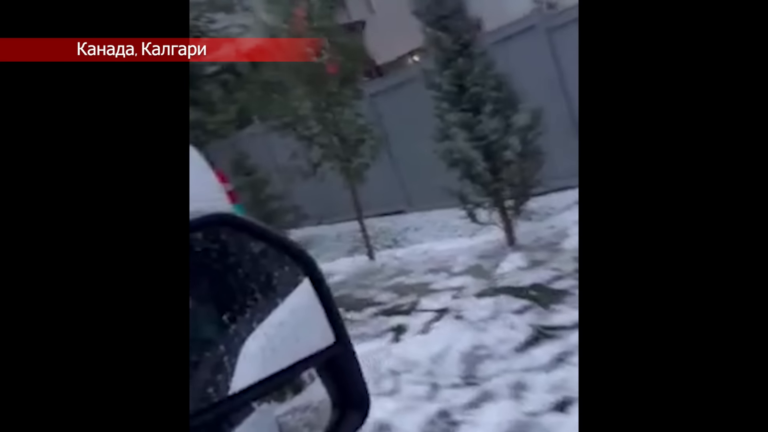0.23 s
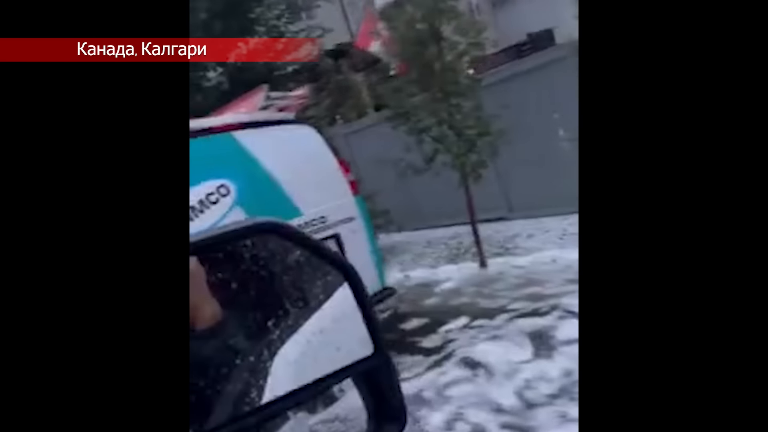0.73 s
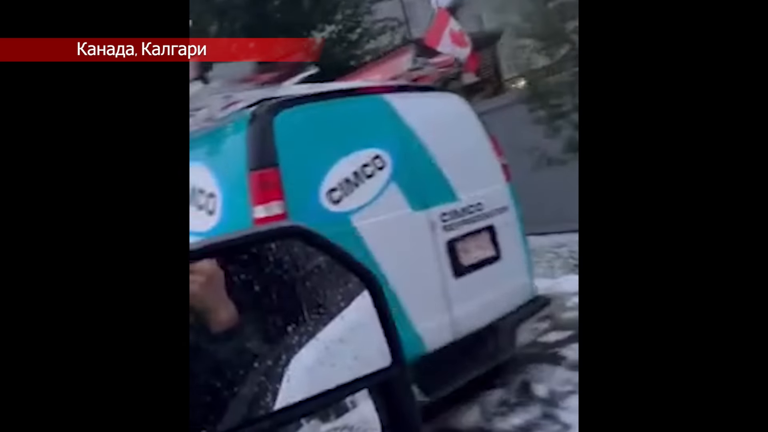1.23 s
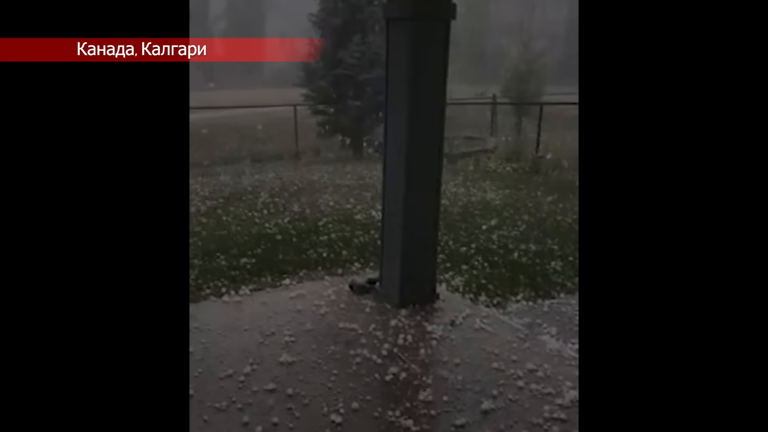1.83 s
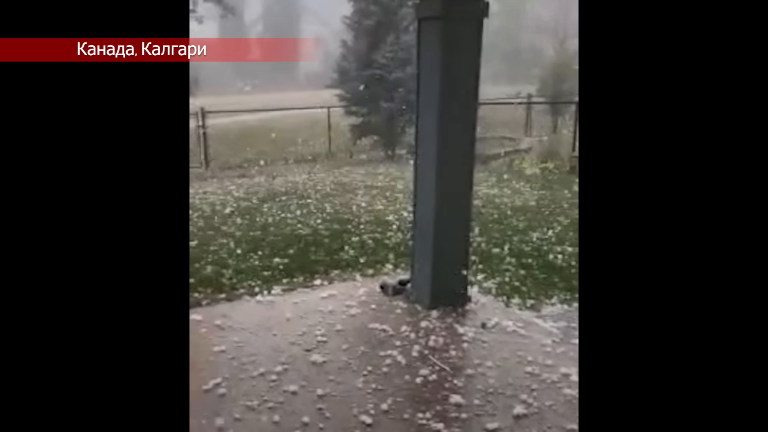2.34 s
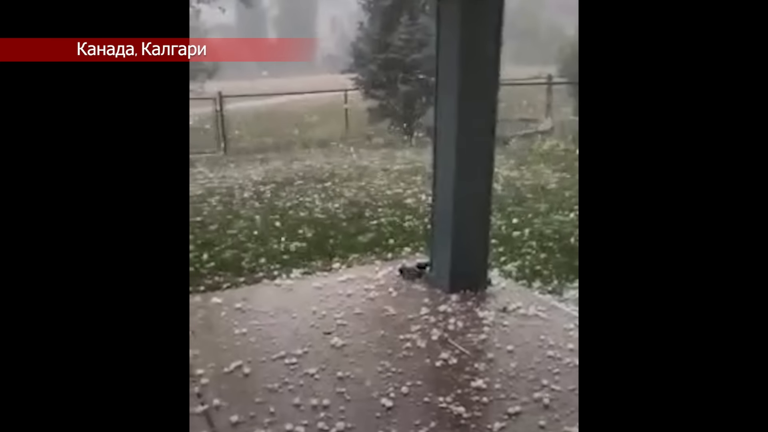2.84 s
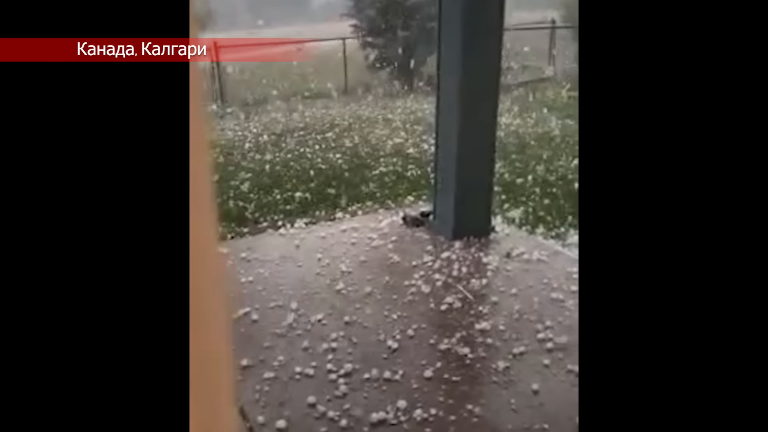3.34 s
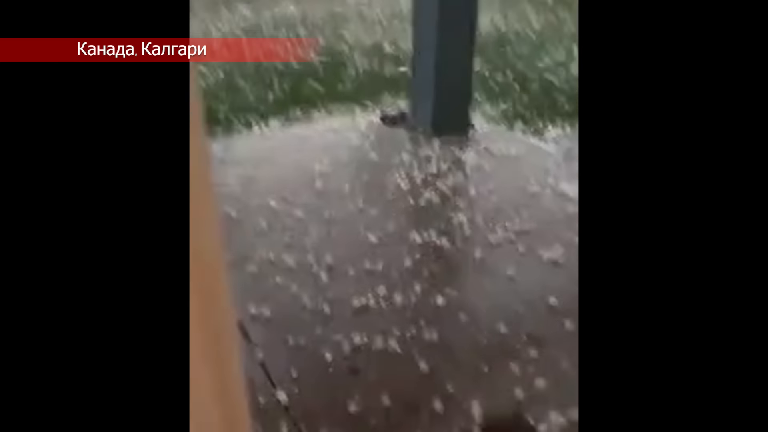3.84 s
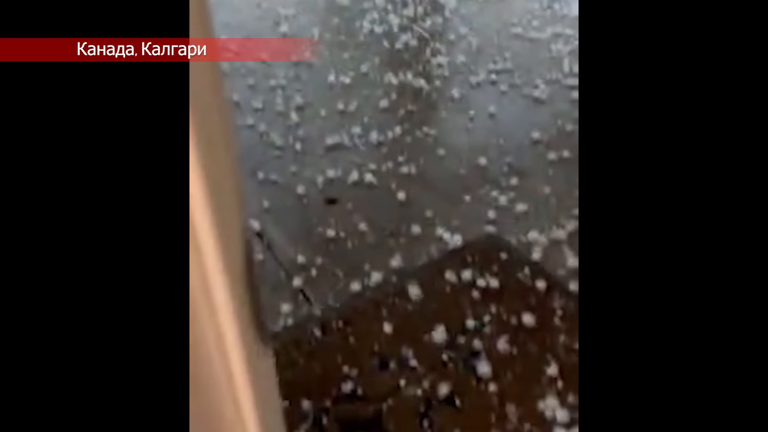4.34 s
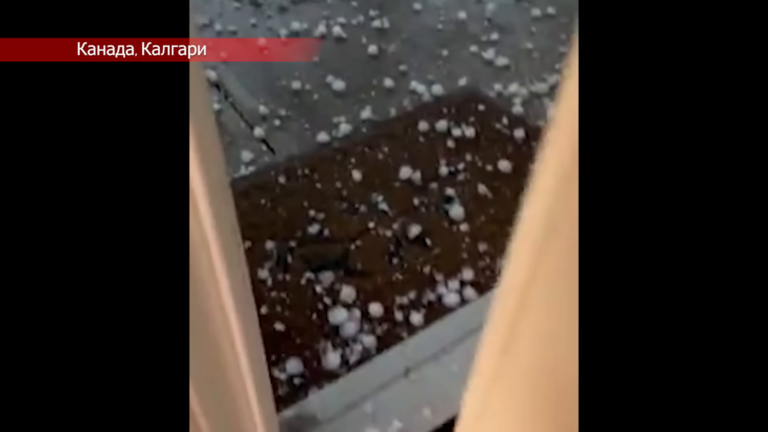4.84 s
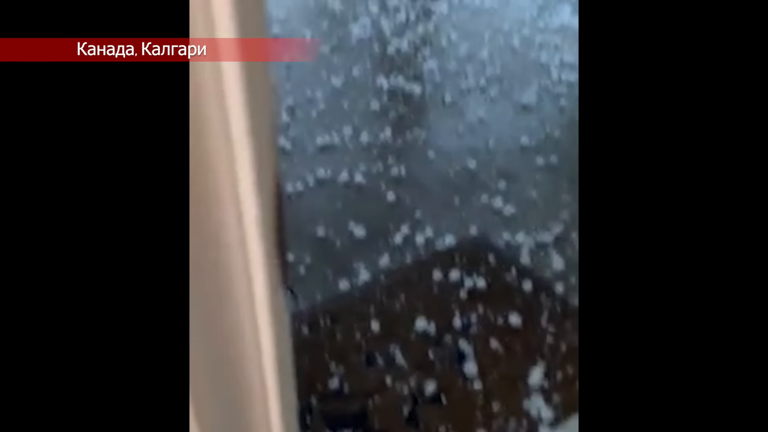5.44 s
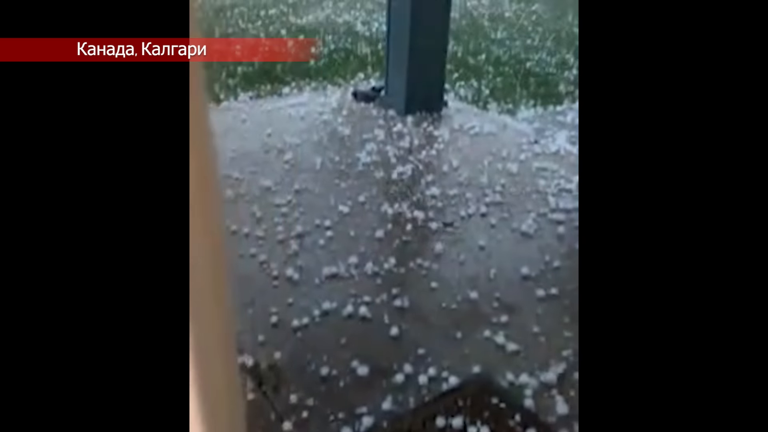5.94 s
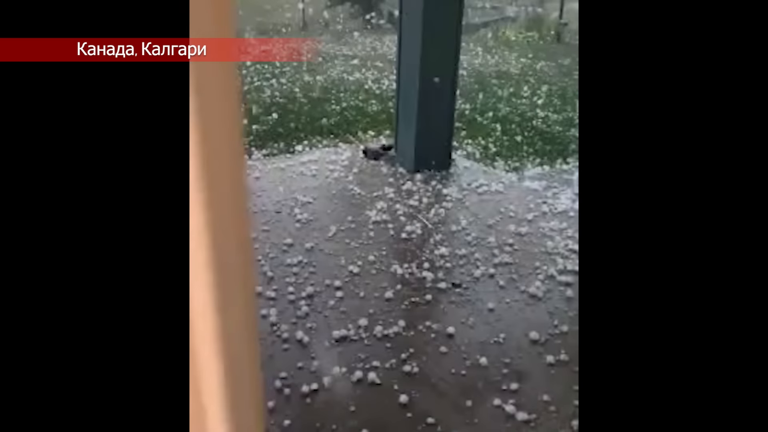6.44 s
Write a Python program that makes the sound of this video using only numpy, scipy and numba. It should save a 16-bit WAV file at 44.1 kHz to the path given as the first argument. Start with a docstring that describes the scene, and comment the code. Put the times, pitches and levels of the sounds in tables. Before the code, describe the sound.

From 0 to 1.65 seconds, a phone at the open window of a slow car hears soft, steady tyre hiss on slush. Low wind buffets thump and flutter against the microphone, thickly clustered until about 0.4, then sparser, with a strong boom near 1.35 and another near 1.56. At 1.65 a hard cut opens onto a hailstorm heard from a doorway. Distant stones make a broad rough roar over faint low rumble; nearer ones patter densely in flurries. Large stones thud dully on roof and lawn and crack sharply on the patio slab, shedding bright splinters with a short porch reflection. It is fullest and widest from 2.7 to 3.8. From about 4.2 the roar drops and heavy hits weaken, quietest near 5.0. It then recovers unevenly, with clear knocks and thuds continuing until the end at about 6.7.

```python
"""Tyres hiss on slush and air buffets thump on the microphone: a phone at the open window of a slow car.
After a hard cut it looks out of a door at a hailstorm: far stones roar, nearer ones patter, and big ones
thud on roof and lawn or crack on the patio slab. The storm dips as the phone turns into the doorway.
Shaped noise makes the hiss, rumble and roar; fading rings make the buffets, patter and single stones.
"""
import sys
import numpy as np
from scipy import signal
from scipy.fft import rfft, irfft
from scipy.io import wavfile
from scipy.ndimage import uniform_filter1d
from numba import njit

SR = 44100
rng = np.random.default_rng(int(sys.argv[2]) if len(sys.argv) > 2 else 0)


def wrap_up_sound(samples):
    """Save the sound to the file named by the first command line argument, as 16-bit audio."""
    columns = np.atleast_2d(samples).T
    # keep every value between -1 and 1, then stretch to whole-number steps
    tamed = np.clip(columns, -1, 1)
    steps = np.round(tamed * 32767).astype(np.int16)
    wavfile.write(sys.argv[1], SR, steps)


N = 294852
CUT_S = 1.655  # the car ends and the hailstorm begins
TIME = np.arange(N) / SR
FREQ = np.maximum(np.arange(N // 2 + 1) * SR / N, 1)


def undb(db):
    """Turn decibels into a gain."""
    return 10 ** (np.asarray(db) / 20)


def over_hz(table, column=1):
    """Join the points of a table column along a log-frequency axis."""
    table = np.array(table)
    return np.interp(np.log(FREQ), np.log(table[:, 0]), table[:, column])


def colour(x, gain):
    """Make each frequency stronger or weaker."""
    return irfft(rfft(x) * gain, N)


def unit(x):
    """Scale to an average (rms) strength of 1."""
    return x / np.sqrt(np.mean(x ** 2))


def walk(rate):
    """Wander smoothly: random levels held for 1 / rate seconds, then averaged twice; spread near 1."""
    hold = int(SR / rate)
    steps = np.repeat(rng.standard_normal(N // hold + 1), hold)
    smooth = uniform_filter1d(uniform_filter1d(steps, hold), hold)
    return np.sqrt(2) * smooth[:N]


@njit
def ring(out, s, hz, size, t60, rise_s, phase):
    """Add damped sine rings, each with its own starting phase in either channel."""
    for k in range(len(s)):
        start = max(int(s[k] * SR), 0)
        # one sample's turn and decay; t60 is the time to fade by 60 dB
        turn = np.exp(2j * np.pi * hz[k] / SR - np.log(1000) / (t60[k] * SR))
        za, zb = size[k] * np.exp(1j * phase[k, 0]), size[k] * np.exp(1j * phase[k, 1])
        lack, fill = 1., np.exp(-1 / (rise_s * SR))
        for i in range(start, min(start + int(t60[k] * SR), out.shape[1])):
            lack *= fill
            za, zb = za * turn, zb * turn
            out[0, i] += (1 - lack) * za.imag
            out[1, i] += (1 - lack) * zb.imag
    return out


def blows(s, hz, db, t60, octaves, rise_s, late, scatter_s, count, loose=1):
    """Each blow rings modes scattered around its pitch; low ones start later, high ones die sooner."""
    s, hz, db, t60 = (np.reshape(v + 0. * s, (-1, 1)) for v in (s, hz, db, t60))
    share = (np.arange(count) + rng.random((len(s), count))) / count
    share = np.clip(share, .01, .99)
    step = 2 ** (octaves * np.log(share / (1 - share)) / 2)  # dense at the pitch, sparse far from it
    mode_hz = np.minimum(hz * step, .4 * SR)
    start = s + late / mode_hz + scatter_s * rng.random(step.shape) ** 2  # late is in cycles
    size = undb(db) / np.sqrt(count) + 0 * step
    fade_s = np.clip(t60 / np.sqrt(step), .002, .6)
    # the less loose the phases, the more the modes start together as a tick
    phase = 2 * np.pi * np.clip(loose, 0, 1) * rng.random((step.size, 2))
    return ring(np.zeros((2, N)), start.ravel(), mode_hz.ravel(), size.ravel(),
                fade_s.ravel(), max(rise_s, 1e-5), phase)


# Colour of tyres on slush, per channel before the ports: f/Hz, level/dB (per Hz)
TYRE_HISS = [(60, -68), (200, -70.5), (500, -71.5), (900, -72.5), (2300, -73.5), (3300, -77.5), (5000, -82),
             (6200, -80), (8500, -80), (10000, -83.5), (11300, -86), (13000, -101), (15600, -87)]


def tyres():
    """Smooth wet hiss: noise weighted by frequency, with a barely flickering level."""
    hiss = colour(rng.standard_normal((2, N)), undb(over_hz(TYRE_HISS)) * np.sqrt(SR / 2))
    return hiss * undb(.4 * walk(14))


# Draught on the microphone: t/s, level/dB (rumble)
DRAUGHT_RUMBLE = [(0, -22), (.15, -35), (.3, -28), (.44, -40), (.6, -47), (1.0, -49), (1.3, -43),
                  (1.45, -43), (1.65, -46)]
# Single puffs of air: t/s, level/dB (boom), f/Hz (centre of boom), level/dB (flutter),
# f/Hz (centre of flutter), nominal boom cycles to fade by 60 dB (the fade time is kept within limits)
AIR_BUFFETS = [(0.0, -36, 87, -9.5, 341, 11), (0.028, -13, 54, -12.5, 325, 18),
               (0.054, -22, 59.4, -16, 344, 12), (0.106, -6.5, 116, -17, 200, 8),
               (0.166, -17, 69, -16, 201, 14), (0.231, -11, 89, -17.5, 326, 9.5),
               (0.254, -8.5, 70.6, -36, 150, 6.5), (0.293, -8, 74, -9, 199, 12.5),
               (0.309, -20, 112, -11, 384, -1), (0.338, -12, 48.4, -12, 257, 9.5),
               (0.401, -27, 70, -29, 198, 5), (0.519, -26.5, 62, -18.5, 336, 17),
               (0.595, -25, 55, -29, 200, 5), (0.852, -22, 68.6, -13, 198, 9.5),
               (1.028, -24.5, 58, -37.5, 150, 9), (1.149, -20, 75, -21.5, 290, 6),
               (1.222, -27, 65, -36, 150, 6), (1.32, -22, 57, -22, 200, 8),
               (1.355, -4.5, 88, -16, 400, 6.5), (1.558, -15.5, 70.4, -17.5, 200, 9),
               (1.594, -28, 60.3, -18.5, 260, 6)]


def air():
    """Low noise rumbles with the draught; each buffet is a short boom and a quick cluster of rings."""
    s, db = np.transpose(DRAUGHT_RUMBLE)
    low_colour = [(15, -44), (45, -13.0), (90, -11.5), (300, -24.0), (1000, -74), (4000, -100)]
    draught = unit(colour(rng.standard_normal((2, N)), undb(over_hz(low_colour))))
    draught = draught * undb(np.interp(TIME, s, db))
    s_hit, boom_db, hz, flutter_db, flutter_hz, cycles = np.transpose(AIR_BUFFETS)
    boom = blows(s_hit, hz, boom_db, t60=cycles / hz, octaves=0.054, rise_s=0.0072,
                 late=0.5, scatter_s=0.0014, count=1)
    flutter = blows(s_hit, flutter_hz, flutter_db, t60=0.041, octaves=0.764, rise_s=0.0015,
                    late=0.24, scatter_s=0.017, count=24)
    return draught + boom + flutter


# Storm level, dipping while the phone is turned into the doorway: t/s, level/dB (before the ports)
STORM_LEVEL = [(1.66, -29), (2.01, -28.5), (2.61, -29.5), (2.89, -27), (3.63, -28), (3.84, -29),
               (4.24, -30), (4.36, -32.5), (4.7, -33), (4.84, -37), (4.98, -38.5), (5.1, -35.5), (5.5, -32),
               (5.93, -31), (6.38, -32.5), (6.69, -29)]


def storm_db(t):
    """Read the storm level at any moment, in straight lines between the points."""
    return np.interp(t, *np.transpose(STORM_LEVEL))


def patter(per_s, hz_low, hz_high, spread_db, most_db, t60, octaves):
    """Small stones ring at random moments and sizes, with about even energy per Hz."""
    when, pitch, luck = rng.random((int(per_s * N / SR), 3)).T
    hz = hz_low * (hz_high / hz_low) ** pitch
    db = np.minimum(-spread_db * np.log(1 - luck), most_db)  # many soft stones, few loud ones
    db = db + 15 * np.log10(hz / 1000)
    hits = blows(when * N / SR, hz, db, t60 * np.sqrt(1000 / hz), octaves, rise_s=0.00012,
                 late=1.492, scatter_s=.005, count=8)
    return unit(hits)


# Colour of the storm, relative, before its bass and treble are levelled: f/Hz, level/dB
HAIL_COLOUR = [(35, -36), (80, -5), (165, 2.5), (230, -2.5), (450, 3), (850, 0), (1300, -5), (1900, -9.5),
               (3000, -8), (4300, -15), (8000, -13), (10000, -17.5), (12500, -33), (13400, -39)]
# Brief lulls in the storm, before its bass and treble are levelled: t/s (deepest), level/dB (change)
STORM_LULLS = [(2.12, -3), (3.068, -5), (3.98, -4.5), (4.48, -3.5)]
LULL_S = 0.017  # time from the deepest point until a lull's depth shrinks to 37 percent
# treble level when the storm is at the pivot level; share of each storm level change that it follows
TREBLE_DB, TREBLE_PIVOT_DB, TREBLE_SHARE = -33.5, -30, 0.83


def storm():
    """Noise roars for far stones under ringing nearer ones; the treble swings less than the roar."""
    far = rng.standard_normal((2, N))
    near = patter(per_s=1100, hz_low=91.4, hz_high=9990, spread_db=2.3, most_db=11.2, t60=0.045, octaves=1.1)
    bed = far + undb(-2.8) * near
    s, depth_db = np.transpose(STORM_LULLS)
    lull_db = sum(depth * np.exp(-((TIME - at) / LULL_S) ** 2) for at, depth in zip(s, depth_db))
    bed = bed * undb(0.82 * walk(9.8) + lull_db)  # stones come in flurries
    bed = colour(bed, undb(over_hz(HAIL_COLOUR)))
    low = colour(bed, 1 / (1 + (FREQ / 1350) ** 4))
    low, high = unit(low), unit(bed - low)
    level_db = storm_db(TIME)
    treble_db = TREBLE_DB + TREBLE_SHARE * (level_db - TREBLE_PIVOT_DB)
    return low * undb(level_db) + high * undb(treble_db)


def rumble():
    """Low noise of the whole storm wanders in level; the doorway does not shade it."""
    low_colour = [(20, -32), (50, -7.5), (100, -5.0), (200, -13.5), (400, -17), (1000, -77)]
    low = colour(rng.standard_normal((2, N)), undb(over_hz(low_colour)))
    return unit(low) * undb(-47 + 1.8 * walk(3.22))


def middling(per_s, above_db, spread_db, hz_low, hz_high):
    """Draw random stones that rise and fall with the storm: time, level, pitch."""
    length_s = N / SR - CUT_S
    when, loudness, pitch = rng.random((int(per_s * length_s), 3)).T
    s = CUT_S + when * length_s
    db = storm_db(s) + above_db + spread_db * (2 * loudness - 1)
    return np.array([s, db, hz_low * (hz_high / hz_low) ** pitch])


def porch(pair, t60, db):
    """Wall and porch roof answer each blow with a short dense tail of fading noise."""
    t = np.arange(int(.3 * SR)) / SR
    tail = rng.standard_normal((2, len(t))) * undb(-60 * t / t60) * (t > .003)
    tail = tail / np.sqrt(np.sum(tail ** 2, axis=1, keepdims=True))
    return pair + undb(db) * signal.fftconvolve(pair, tail, axes=1)[:, :N]


# Biggest stones on roof and lawn, before the porch: t/s, level/dB, f/Hz (centre)
BIG_THUDS = [(1.656, -23, 536), (1.792, -17, 790), (1.811, -18.5, 1130), (1.899, -18, 835),
             (1.94, -15.5, 433), (2.013, -16, 800), (2.027, -12.5, 394), (2.075, -16.5, 630),
             (2.133, -17, 410), (2.177, -14, 714), (2.205, -15.5, 623), (2.281, -9, 518), (2.37, -15, 536),
             (2.456, -12.5, 476), (2.478, -18, 614), (2.53, -22, 618), (2.795, -15.5, 870),
             (2.844, -15, 310), (2.914, -18, 500), (2.957, -14, 415), (2.993, -10, 490),
             (3.026, -14.5, 458), (3.081, -15, 706), (3.087, -17.5, 1234), (3.108, -16.5, 410),
             (3.159, -12.5, 550), (3.222, -14.5, 910), (3.268, -17, 494), (3.332, -16, 774),
             (3.304, -14.5, 410), (3.385, -11, 400), (3.408, -15, 862), (3.431, -10, 696), (3.45, -24, 580),
             (3.58, -13.5, 865), (3.627, -12, 800), (3.685, -15, 363), (3.723, -16, 425), (3.8, -14, 427),
             (3.847, -16, 297), (3.919, -24, 483), (3.939, -12.5, 405), (3.994, -9, 535),
             (4.23, -14.5, 696), (4.272, -17, 756), (4.432, -21, 300), (4.447, -18, 1250),
             (4.461, -23, 273), (4.568, -25, 395), (4.6, -24, 286), (4.854, -22, 288), (5.073, -22, 596),
             (5.171, -26, 640), (5.251, -22, 560), (5.353, -21, 506), (5.389, -22.5, 730),
             (5.489, -19, 588), (5.509, -17.5, 442), (5.684, -20, 570), (5.724, -20, 780),
             (5.778, -21, 696), (5.802, -32, 600), (5.883, -30, 920), (5.937, -17, 740), (6.065, -20, 388),
             (6.242, -14, 696), (6.349, -22, 303), (6.496, -18, 763), (6.532, -24.5, 416),
             (6.582, -25, 537), (6.619, -20, 776)]
# Biggest stones on the slab, before the porch: t/s, level/dB (knock), f/Hz (centre of knock),
# level/dB (splinters), level/dB (own note, relative to the knock)
BIG_CRACKS = [(1.658, -25, 2780, -16.5, -9), (1.6824, -17.5, 2340, -20.5, -1), (1.869, -18, 3820, -19, -10),
              (1.933, -34, 1790, -20.5, 5), (2.0147, -13, 2720, -16, -11), (2.028, -17, 2320, -20, -16),
              (2.0575, -14, 3300, -19, -15), (2.142, -14.5, 3200, -15, -13), (2.178, -26, 2190, -14, 0),
              (2.2018, -20, 2260, -14, -5), (2.277, -18, 1790, -31, -7), (2.286, -19, 2090, -31, -2),
              (2.368, -14, 2310, -15.5, -11), (2.422, -22, 1990, -35, 7), (2.47, -18.5, 2380, -34, 6),
              (2.5403, -32, 4470, -33, 2), (2.7064, -19, 4320, -15, -7), (2.764, -21, 3340, -15, -11),
              (2.803, -20, 4720, -14.5, 1), (2.843, -21, 4560, -15.5, -3), (3.0806, -18, 3350, -37, -7),
              (3.153, -24, 3260, -33, -5), (3.217, -14, 3310, -25, -3), (3.2237, -11, 3260, -20, -2),
              (3.3005, -14, 3800, -15, -17), (3.332, -20, 3280, -38, 1), (3.384, -12, 3670, -13.5, -9),
              (3.4099, -14, 2540, -14.5, -9), (3.495, -20, 3340, -27, -4), (3.521, -11, 3120, -17.5, -7),
              (3.524, -14.5, 3180, -24, 5), (3.579, -22, 3580, -28, 5), (3.6274, -15, 2370, -17, -12),
              (3.6358, -12.5, 2990, -16.5, -3), (3.681, -16, 2760, -18, -8), (3.7706, -15, 2820, -18, -10),
              (3.852, -22, 2680, -23, -6), (4.0057, -16.5, 2720, -14, -1), (4.0313, -21, 2680, -14, -1),
              (4.0494, -14, 2370, -45, -18), (4.076, -32, 1600, -36, -5), (4.119, -36, 3600, -19.5, -10),
              (4.1749, -14, 2810, -14.5, -2), (4.2033, -14.5, 2410, -15, -3), (4.243, -20, 1650, -22, -7),
              (4.28, -23, 1960, -30, -9), (4.32, -17.5, 3800, -29, -9), (4.327, -11, 2360, -24, -17),
              (4.445, -14.5, 2130, -13.5, -1.5), (4.562, -34, 4470, -19, -4), (4.6802, -23, 2850, -21, -8),
              (4.766, -24, 2220, -32, -9), (4.8216, -26, 2370, -18.5, 1), (4.8536, -24, 2560, -41, -8),
              (5.0495, -21, 2250, -21, -13), (5.11, -20, 2830, -22, -2), (5.1686, -27, 2690, -22, -8),
              (5.246, -28, 2520, -24, -8), (5.373, -30, 1760, -20, -4), (5.4557, -26, 2140, -27, -2),
              (5.499, -17.5, 2980, -20, -8), (5.5336, -19, 3500, -21, -19), (5.688, -20.5, 2430, -34, -8),
              (5.727, -21, 2880, -23, -4), (5.78, -16.5, 3230, -19, 0), (5.8684, -29, 1570, -24, -8),
              (5.881, -23, 2800, -33, -3), (5.9242, -27, 1450, -28, -5), (5.9378, -15, 2150, -39, -0.5),
              (6.008, -24, 3330, -14.5, -7), (6.028, -16.5, 2280, -25, -4), (6.096, -24, 2750, -13, -1),
              (6.107, -42, 4700, -15, -9), (6.179, -22, 2380, -25, -3), (6.2427, -24, 3200, -18, -9),
              (6.374, -33, 2400, -42, -8), (6.403, -22, 2690, -23, -9), (6.428, -21, 2230, -13, 8),
              (6.442, -17.5, 2900, -24, -2), (6.5, -21, 2420, -13.5, 4), (6.5336, -25, 2860, -31, 5),
              (6.578, -23, 2600, -29, -2), (6.6056, -20.5, 3060, -19, -4)]


def stones():
    """Single stones: dull thuds, and cracks that ring the slab and shed bright splinters."""
    small_thuds = middling(per_s=5, above_db=4.5, spread_db=4.3, hz_low=300, hz_high=925)
    s, db, hz = np.hstack([np.transpose(BIG_THUDS), small_thuds])
    thuds = blows(s, hz, db, t60=0.042, octaves=0.6, rise_s=0.0022,
                  late=0, scatter_s=0.00701, count=20, loose=0.89)
    spot_note = blows(s, hz, db - 3, t60=0.051, octaves=0.024, rise_s=0.0013,
                      late=0, scatter_s=0.0016, count=1, loose=0.37)  # of the struck spot

    small = middling(per_s=16, above_db=3.6, spread_db=3.5, hz_low=1210, hz_high=5000)
    small_cracks = np.vstack([small, small[1] - 5, 0 * small[1] - 9])  # splinter and note levels
    s, db, hz, splinter_db, note_db = np.hstack([np.transpose(BIG_CRACKS), small_cracks])
    knock = blows(s, hz, db, t60=0.019, octaves=0.701, rise_s=0.00033,
                  late=0.62, scatter_s=.006, count=30, loose=0.69)
    stone_note = blows(s, hz, db + note_db, t60=0.02, octaves=0.013, rise_s=0.00065,
                       late=0, scatter_s=0.0008, count=1, loose=0.28)
    splinters = blows(s, 6850, splinter_db, t60=0.012, octaves=0.72, rise_s=0.00027,
                      late=0, scatter_s=.009, count=60, loose=0.72)
    near = porch(thuds + spot_note + knock + stone_note + splinters, t60=0.089, db=-4.5)
    return colour(near, undb(over_hz([(9000, -2.5), (12500, 2), (13400, -59)])))


OPPOSED_HZ = 10810  # from here up the two ports move against each other


def ports(pair, table):
    """The right port hears a share of the left's sound, turned in phase, and the rest unrelated."""
    table = list(table) + [(OPPOSED_HZ, 0, 1, np.pi)]
    tilt_db, lead = over_hz(table, column=1), over_hz(table, column=3)
    like = np.clip(over_hz(table, column=2), 0, 1)
    left = colour(pair[0], undb(tilt_db / 2))
    shared = colour(pair[0], like * np.exp(1j * lead) * undb(-tilt_db / 2))
    unrelated = colour(pair[1], np.sqrt(1 - like ** 2) * undb(-tilt_db / 2))
    return np.array([left, shared + unrelated])


# How the two microphone ports hear the car: f/Hz, level/dB (left minus right),
# likeness (0-1), phase by which right leads [radians]
CAR_PORTS = [(30, 0, .995, 0), (70, .5, .98, 0), (120, .5, .85, -.15), (200, 1, .8, -.3),
             (520, 1.5, .7, -.4), (900, -3, .7, -.5), (1500, -2, .88, -.4), (2300, 1, .8, -.4),
             (3100, 1, .3, 0), (4000, 0, .62, .2), (4900, -1.5, .2, .3), (6000, 0, .75, .2),
             (9300, 0, .72, 1.4)]
# The same at the door, before the stereo width changes: f/Hz, level/dB (left minus right),
# likeness (0-1), phase by which right leads [radians]
DOOR_PORTS = [(220, 0, .9995, 0), (350, -.5, .99, .05), (550, -2.5, .95, .1), (900, -4, .86, .1),
              (1250, -4.5, .55, -.2), (1600, -2, .7, -.35), (2200, 0, .88, -.15), (3000, 1, .25, .4),
              (3600, -2, .22, 0), (4600, 0, .96, 0), (6600, 0, .95, .05), (8000, 0, .68, 1.05),
              (9400, 0, .53, 1.9)]
# change of the left-right difference, mostly below 5 kHz; middle and length of each turn
NARROW_DB, WIDE_DB, WIDE_FROM_S, WIDE_TO_S, TURN_S = -2, 1.5, 2.7, 3.79, 0.13


def scene():
    """Play the car window, then cut hard to the hailstorm, which both ports hear differently."""
    car = ports(tyres() + air(), CAR_PORTS)
    hail = ports(storm() + rumble() + stones(), DOOR_PORTS)
    # the stereo sound widens for a while as the phone faces the open yard
    opened = np.clip(np.minimum(TIME - WIDE_FROM_S, WIDE_TO_S - TIME) / TURN_S + .5, 0, 1)
    side = colour(hail[0] - hail[1], 1 / (1 + (FREQ / 5000) ** 4)) / 2
    width = undb(NARROW_DB + (WIDE_DB - NARROW_DB) * opened)
    hail = hail + np.array([[1], [-1]]) * side * (width - 1)
    door = np.clip((TIME - CUT_S) / 0.006, 0, 1)  # the cut is a 6 ms crossfade
    return car * (1 - door) + hail * door


def record(dry):
    """The phone cuts the top: a steep low-pass filter at 15.5 kHz."""
    low_pass = signal.ellip(8, .2, 70, 15500, fs=SR, output="sos")
    return signal.sosfilt(low_pass, dry)


dry = scene()
out = record(dry)
wrap_up_sound(out)
```